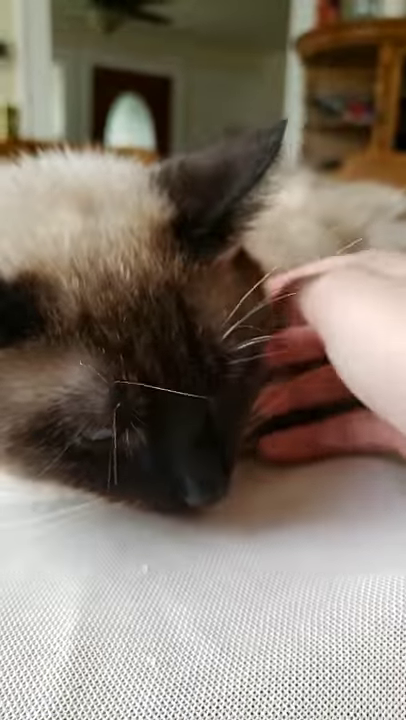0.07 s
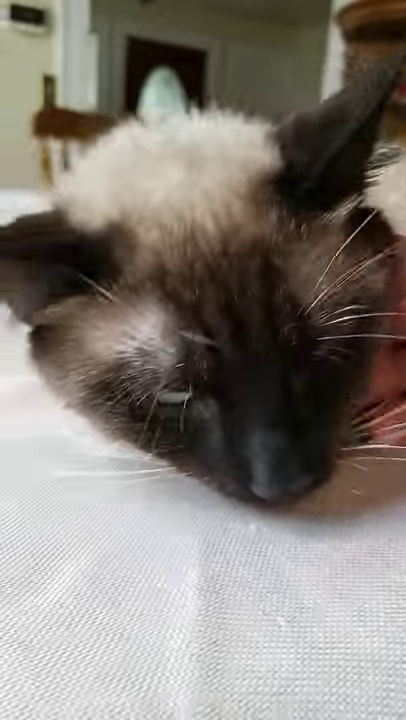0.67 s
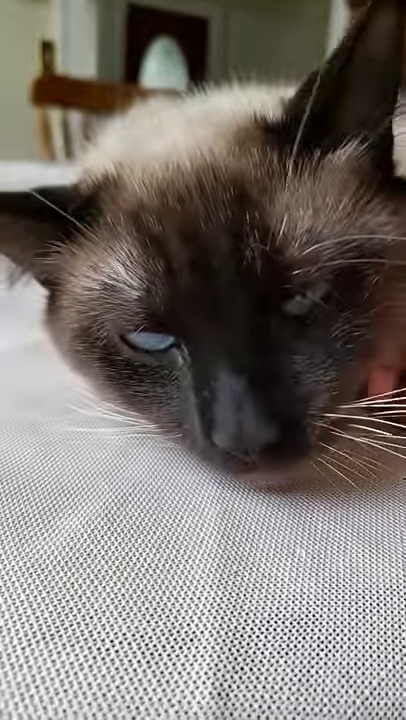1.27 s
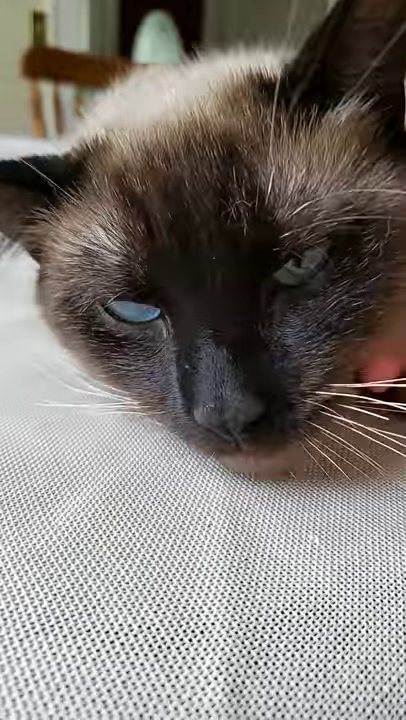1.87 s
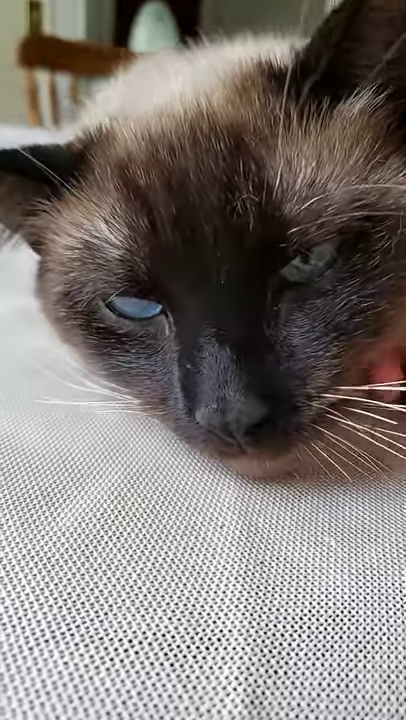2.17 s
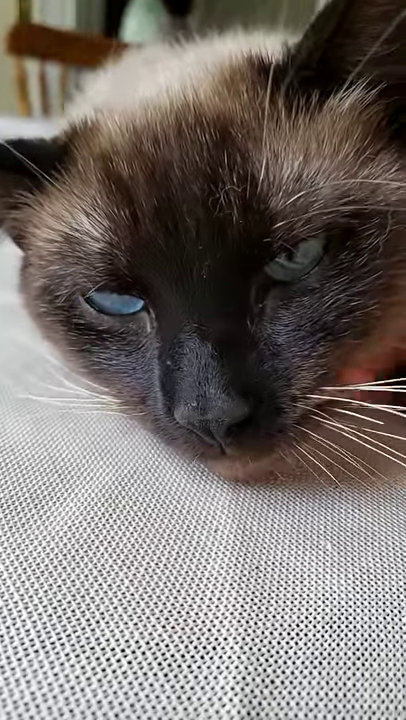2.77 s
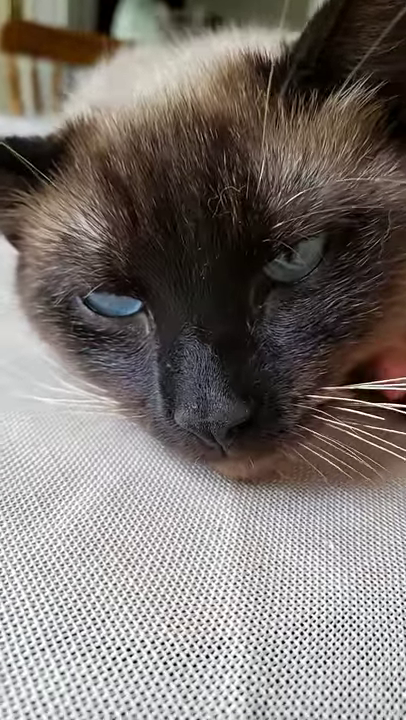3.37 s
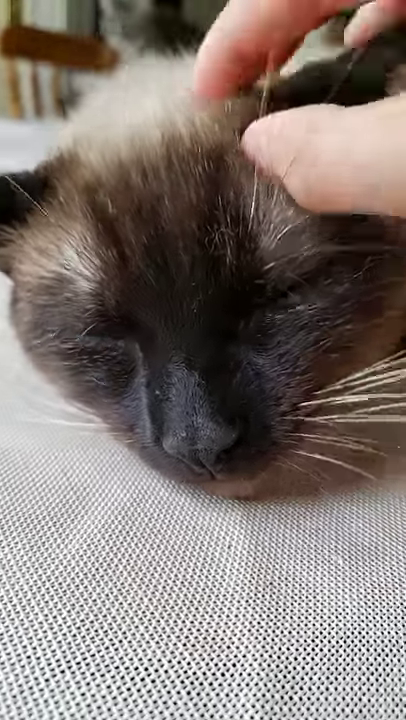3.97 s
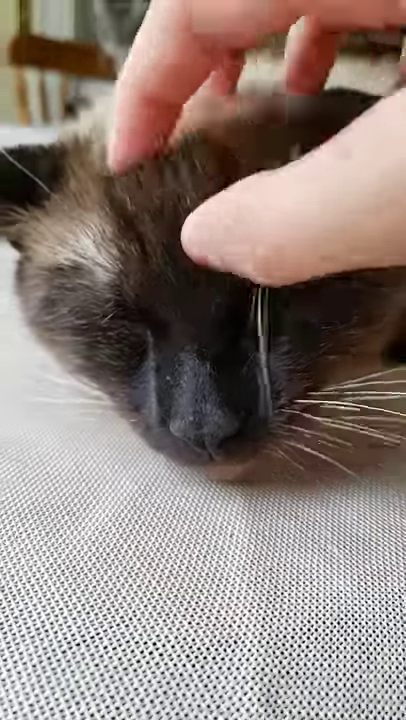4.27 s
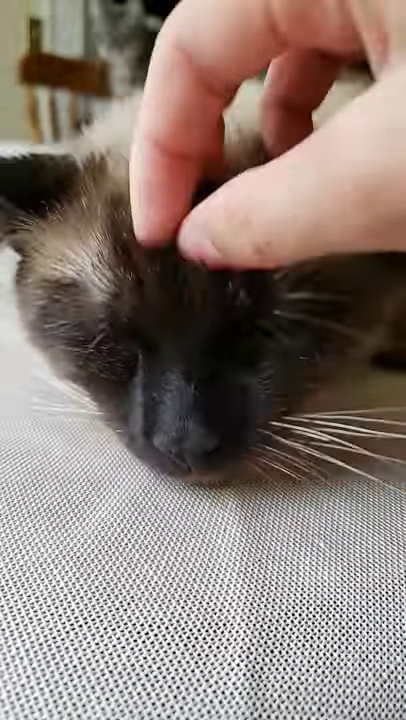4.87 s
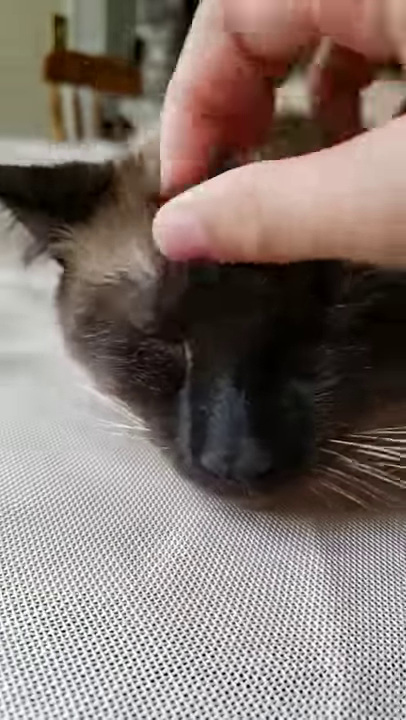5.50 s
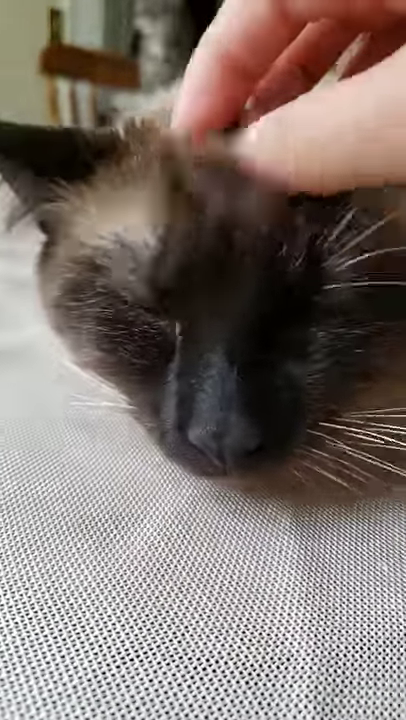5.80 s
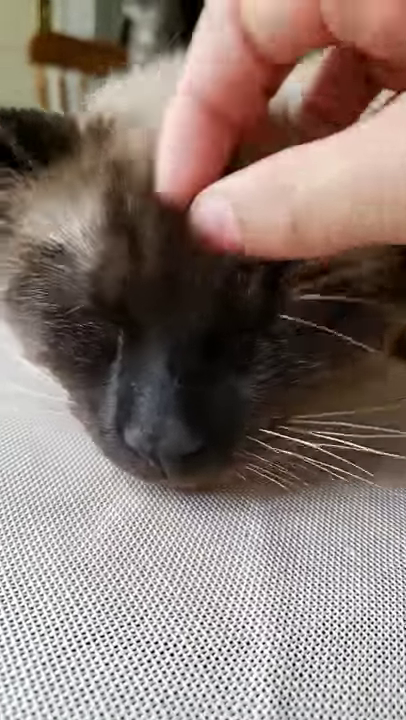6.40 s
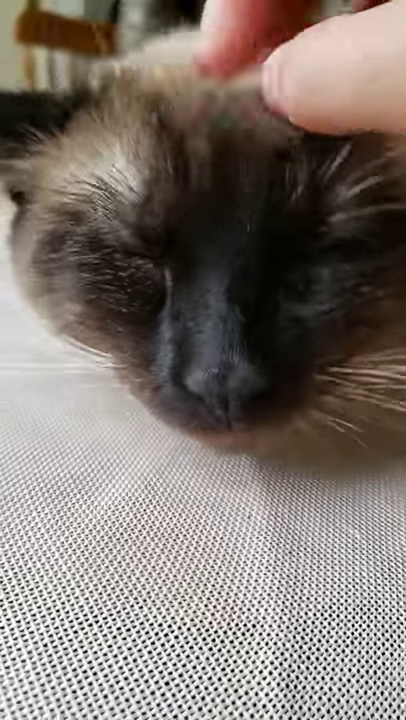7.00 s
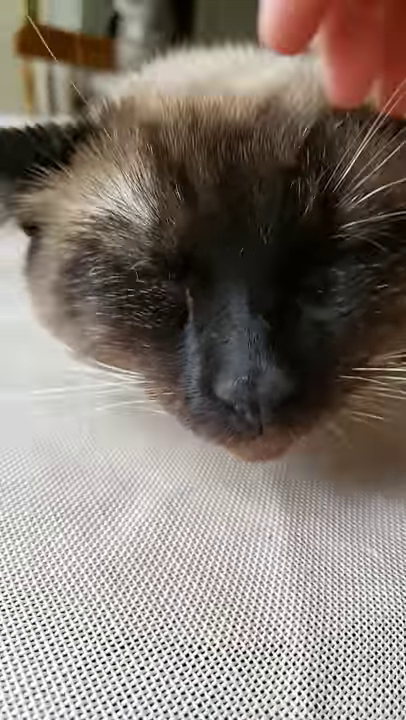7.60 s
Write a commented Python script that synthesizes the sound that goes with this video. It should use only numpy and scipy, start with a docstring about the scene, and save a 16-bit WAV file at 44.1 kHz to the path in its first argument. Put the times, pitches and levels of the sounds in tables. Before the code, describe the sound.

Fingers quietly stroke a cat's coat indoors, with a few dull microphone bumps and a low ventilation drone.

```python
"""Fingers rub a cat's cheek, then scratch the top of its head, close to a hand-held camera.
Each stroke bends and releases a crowd of hairs: a faint, bright swish with a coarser scratch in it,
and now and then the tick of one stiff hair. The arm rustles and the hand bumps the camera softly.
Low rumble swells: the room's deep boom at both microphones, handling rumble at the right one.
Underneath lies a bed of ventilation drone, motor hum and microphone hiss."""
import sys
import numpy as np
from scipy import signal
from scipy.fft import rfft, irfft
from scipy.io import wavfile

SR = 44100
rng = np.random.default_rng(int(sys.argv[2]) if len(sys.argv) > 2 else 0)


def int16_out(signal):
    """Quantize to a 16-bit WAV file."""
    q = np.round(np.clip(np.atleast_2d(signal).T, -1, 1) * 32767)
    wavfile.write(sys.argv[1], SR, q.astype(np.int16))


N = 337365
TIME, FREQS = np.arange(N) / SR, np.fft.rfftfreq(N, 1 / SR)

# firm finger strokes: fastest at t/s, length/s, swish level/dB, scratch send/dB
STROKES = [(.865, 0.3, -78, -6.5), (1.312, 0.071, -76.5, -9), (1.62, 0.11, -73.5, -9.5),
           (1.755, 0.13, -75, -8), (2.007, .055, -69.5, -6.5), (2.12, 0.11, -67.5, -7.5),
           (2.32, 0.025, -71.5, -4.5), (2.38, .07, -75, -3.5), (2.436, 0.095, -82, -4),
           (2.575, 0.049, -70, -8), (2.648, 0.086, -79, -6), (3.44, .143, -68, -15),
           (3.862, 0.068, -68.5, -13), (3.918, 0.087, -68, -11), (4.12, .14, -78.5, -5.5),
           (4.225, 0.1, -67.5, -11.5), (4.396, .11, -68, -9), (4.512, .085, -68, -10),
           (4.655, 0.088, -67.5, -11), (4.76, .065, -68.5, -9.5), (4.867, .12, -75, -8),
           (4.941, 0.063, -65, -8), (5.012, .2, -74, -5.5), (5.145, 0.1, -68, -9),
           (5.29, 0.095, -66, -10.5), (5.426, .108, -64.5, -11.5), (5.553, 0.22, -73, -8.5),
           (5.833, 0.079, -67.5, -7.5), (6.1, 0.16, -71, -11.5), (6.365, 0.089, -71, -6),
           (6.595, 0.066, -70.5, -9), (6.804, 0.18, -72, -9.5), (6.99, .08, -65.5, -12),
           (7.116, 0.29, -72, -7.5), (7.223, 0.043, -66, -14), (7.304, 0.072, -71, -8)]
# spells of light rubbing: start/s, end/s, swish level/dB
RUB_SPELLS = [(0, 0.19, -76), (.6, 2.94, -80.5), (3.95, 7.55, -81.5)]
# where the fingers are: t/s, place (0 cheek .. 1 top of the head)
FINGER_PLACE = [(0, 0.029), (2.6, 0.05), (3.45, .4), (3.9, .6), (4.25, 0.81), (7.65, 1)]
# EQ of the hair tips' swish: f/Hz, gain/dB
SWISH_EQ = [(1500, -59), (5000, -26.5), (9000, -24.5), (10800, -6.5), (12100, -1.5), (14200, 2.5),
            (15100, 6.5), (16000, -3)]
# EQ of the scratch through the coat: f/Hz, gain/dB
SCRATCH_EQ = [(500, -11), (1000, 3.5), (2200, -2.5), (3300, -2.5), (5300, -4), (6800, -1.5), (7900, 4.5),
              (8600, -1), (10500, -3.5), (15000, -22.5)]
# the fingers cup a hollow against the head: t/s, length/s, f/Hz, ring send/dB
CUPS = [(2.0, 0.087, 10300, 5), (2.13, 0.14, 11800, 1), (2.35, 0.14, 7700, 4), (2.62, 0.15, 7800, 1),
        (3.9, .2, 7600, 1), (4.99, .24, 7000, 2.5)]
# fur at the right microphone against the left: f/Hz, gain from the cheek/dB, gain from the top/dB
RIGHT_MIC_EQ = [(1000, -7, -6), (1390, 3, 2), (1930, 11, -2), (2770, -3, -1.5), (4270, 3.5, -2.5),
                (5800, 6, -1.5), (7300, 6.5, -3), (7520, -2.5, -7), (8700, -11, -19), (9400, -2, -7),
                (11700, -1, -12.5), (15300, -6, -29)]
# single hairs snap back: t/s, peak level/dB, left-right/dB, centre f/Hz
HAIR_SNAPS = [(.493, -61.5, -8, 1900), (.738, -62, 8, 1100), (2.089, -63, 2, 2000), (2.122, -51, 5, 12000),
              (2.325, -63, 7, 7500), (4.657, -55, 10, 13000), (4.751, -62, 11, 7490), (4.938, -58, 9, 8000),
              (5.41, -59, 11, 13000)]
# the arm moves: t/s, length/s, relative level/dB, left-right/dB
ARM_MOVES = [(.12, .25, -83.5, -8), (0.788, 0.29, -81, -2), (1.177, 0.41, -82, -1), (2.128, 0.13, -74, -3),
             (2.775, 0.34, -81.5, -3), (3.12, 0.29, -79, -4), (3.594, 0.17, -81.5, 0),
             (4.497, .08, -79, -1), (4.825, 0.18, -80.5, 9), (5.135, 0.68, -80.5, -2),
             (6.1, 0.22, -86, -3.5), (6.783, 0.15, -78.5, 5.5), (7.6, 0.26, -79, 1)]
# EQ of the arm's rustle: f/Hz, gain/dB
RUSTLE_EQ = [(300, -22.5), (700, -7), (880, 0.5), (1100, -0.5), (1280, -5), (1500, -10), (1850, -11.5),
             (2300, -22), (3500, -31)]
# the hand bumps the camera: t/s, peak level/dB, f/Hz, left-right/dB
BUMPS = [(0.823, -37, 51.3, -1), (2.07, -38.5, 62.4, -14), (6.214, -40, 65, -22), (6.294, -35, 55, -16),
         (6.484, -39.5, 50.3, -3), (6.774, -39.5, 218, -3)]
# low rumble swells: t/s, length/s, relative level/dB, left-right/dB
RUMBLE_SWELLS = [(0.143, 0.28, -46.5, -0.5), (0.788, 0.27, -43.5, -1), (1.743, 0.15, -48, -18.5),
                 (2.054, 0.31, -50, -14), (3.28, .25, -47, 0), (3.923, 0.097, -49.5, -18),
                 (4.202, 0.23, -48, 1), (5.45, 0.21, -46.5, 2), (6.225, 0.17, -44, -18)]
# EQ of the low rumble: f/Hz, gain/dB
LOW_RUMBLE_EQ = [(15, -32.5), (32, -6.5), (46, 0.5), (60, -1), (80, -0.5), (110, -12.5), (160, -21.5),
                 (300, -34.5), (600, -79)]
# EQ of the moving air's rumble: f/Hz, gain/dB
AIR_EQ = [(15, -35.5), (30, -17), (42, -5), (60, -7.5), (125, -7.5), (150, -15), (190, -18.5), (300, -17.5),
          (380, -19.5), (450, -22.5), (560, -30), (720, -38.5), (1000, -51), (3000, -67.5)]
# room resonances: f/Hz, width/Hz, relative level/dB
ROOM_MODES = [(49.25, 6, -52), (76.4, 24, -56), (102.3, 4.7, -53.5), (118.9, 8.7, -58), (219.8, 5.7, -68.5),
              (235.3, 18, -64.5), (277, 15, -63.5), (312.4, 13, -69.5), (430.3, 25, -74.5),
              (509.4, 9.1, -79), (538.5, 7.2, -80), (610, 23, -81)]
# the room's stereo image: f/Hz, left-right likeness (0..1), left-right/dB
ROOM_STEREO = [(39.7, 1, 0.5), (69.3, 0.95, -1), (115.5, 0.88, -1.5), (173, 0.87, 1.5), (273, 0.77, 0),
               (444, 0.54, -2.5), (595, 0.34, -2), (1150, 0, -1.5), (2410, 0, 0)]
# the low hum surges: t/s, level/dB
HUM_SURGES = [(1.85, -46), (2.8, -48), (3.2, -49), (3.54, -45.5), (3.83, -47.5), (4.11, -48), (4.56, -47),
              (5.84, -46), (6.18, -45.5), (6.46, -48.5)]
# fader ride of the hum's third harmonic: t/s, relative level/dB
THIRD_RIDE = [(0, -71), (1.2, -65.5), (2.0, -64), (3.1, -63), (3.7, -69), (4.5, -65), (6.3, -65),
              (7.65, -70)]
# the higher tone swells: t/s, length/s, relative level/dB
TONE_SWELLS = [(1.52, 0.15, -57.5), (1.75, 0.26, -54), (3.97, 0.14, -58.5), (4.28, .2, -62),
               (4.71, 0.15, -58.5), (4.97, 0.21, -57.5), (5.26, 0.15, -55.5), (5.47, 0.13, -55),
               (6.89, 0.27, -55), (7.2, .1, -58.5)]
# faint steady tones in the hum: f/Hz, level/dB, left-right/dB, left phase lead/rad
FAINT_TONES = [(265.3, -72, 2, 0.74), (301.4, -72.5, -11, 0)]
# EQ of the microphone hiss: f/Hz, gain/dB
HISS_EQ = [(500, 1.5), (2000, 3.5), (3000, 3), (5000, -0.5), (7500, -4.5), (9000, -9), (10500, -3),
           (12300, 3.5), (14300, 1), (15200, 5), (16000, 2.5)]


def fur(scratch_trim_db=1.5, rub_scratch_db=-11.5, catch_db=1.06):
    """Each stroke speeds up and slows down, catching unevenly in the coat."""
    light = rubbing()
    swish_gain = swells([(s, length, db) for s, length, db, _ in STROKES], light)
    scratches = [(s, length, db + send_db) for s, length, db, send_db in STROKES]
    scratch_gain = amp(scratch_trim_db) * swells(scratches, amp(rub_scratch_db) * light)
    swish = swish_gain * hairs(SWISH_EQ, per_s=11000, spread_db=-1.2)
    scratch = scratch_gain * hairs(SCRATCH_EQ, per_s=13000, spread_db=0.6)
    left, right = hand_hollow(swish + scratch) * amp(catch_db * drift(74))
    return np.array([left, camera_shadow(right)])


def rubbing(uneven_db=3.7, uneven_hz=7, fade_s=0.062):
    """The envelope of light, uneven rubbing while the fingers stay in the coat."""
    spells = sum(amp(db) * (np.tanh((TIME - start) / fade_s) - np.tanh((TIME - end) / fade_s)) / 2
                 for start, end, db in RUB_SPELLS)
    return spells * amp(uneven_db * drift(uneven_hz))


def hairs(eq, per_s, spread_db):
    """A dense crowd of tiny slips of uneven size; each microphone picks up its own."""
    slips = rng.standard_normal((2, N)) * (rng.random((2, N)) < per_s / SR)
    sizes = amp(spread_db * np.minimum(rng.exponential(1, N), 4))
    return unit_rms(equalise(slips * sizes, eq))


def hand_hollow(sound, open_hz=7000, open_db=-13, width_hz=900):
    """The hollow between fingers and head rings: faintly under the open hand, more when cupped."""
    cupped = sum(amp(db) * swell(s, length) * resonate(sound, hz, width_hz)
                 for s, length, hz, db in CUPS)
    return sound + cupped + amp(open_db) * resonate(sound, open_hz, width_hz)


def camera_shadow(right):
    """The camera body shades the right microphone more once the hand is on top of the head."""
    on_top = curve(FINGER_PLACE)
    from_cheek, from_top = (equalise(right, RIGHT_MIC_EQ, column) for column in (1, 2))
    return (1 - on_top) * from_cheek + on_top * from_top


def hair_snaps(decay_cycles=1.6, width_octaves=1.0):
    """A stiff hair slips off a finger with a tiny tick; duller ticks last longer."""
    out = np.zeros((2, N))
    t = np.arange(512) / SR
    hz = np.fft.rfftfreq(len(t), 1 / SR)
    for s, db, balance_db, centre_hz in HAIR_SNAPS:
        burst = rng.standard_normal((2, len(t))) * np.exp(-t * centre_hz / decay_cycles)
        centred = np.roll(burst, len(t) // 2, axis=1)  # leaves the filter space to ring both ways
        tick = irfft(rfft(centred) * band(hz, centre_hz, width_octaves))
        tick /= np.abs(tick).max(axis=1, keepdims=True)
        add(out, s - t[-1] / 2, amp(db) * pan(balance_db) * tick)
    return out


def arm_rustle(trim_db=4.0, rest_db=-82.5, uneven_db=1.5):
    """Dull, soft noise that follows the arm as it moves from side to side."""
    rest = amp(rest_db + uneven_db * drift(5.4)) * pan(-1.0)
    move_power = sum((amp(db) * pan(balance_db) * swell(s, length)) ** 2
                     for s, length, db, balance_db in ARM_MOVES)
    return amp(trim_db) * np.sqrt(rest ** 2 + move_power) * room_noise(amp(spectrum(RUSTLE_EQ)))


def camera_bumps(fade_cycles=0.71):
    """The hand pushes the camera: a cycle or two of dull thud."""
    out = np.zeros((2, N))
    for s, db, hz, balance_db in BUMPS:
        cycles = hz * (TIME - s)
        thud = np.exp(-(cycles / fade_cycles) ** 2) * np.cos(2 * np.pi * cycles)
        out += amp(db) * pan(balance_db) * thud
    return out


def low_rumble(trim_db=-1, stereo_width=0.19):
    """Low rumble swells: the room's deep boom at both microphones, handling rumble at the right one."""
    noise = rng.standard_normal(N) + stereo_width * rng.standard_normal((2, N))
    gain = sum(amp(db) * pan(balance_db) * swell(s, length)
               for s, length, db, balance_db in RUMBLE_SWELLS)
    return amp(trim_db) * gain * unit_rms(equalise(noise, LOW_RUMBLE_EQ))


def ventilation(rumble_db=-52.5, modes_db=-48.5):
    """Moving air rumbles, and the room rings with it at its resonances."""
    rumble = amp(rumble_db) * room_noise(amp(spectrum(AIR_EQ)))
    mode_power = sum(amp(db) ** 2 / width / (1 + ((FREQS - hz) / (width * 0.56)) ** 2) ** 2
                     for hz, width, db in ROOM_MODES)
    return rumble + amp(modes_db) * room_noise(np.sqrt(mode_power))


def motor_hum(hz=118.35, rest_db=-56.5, surge_s=0.14, wander_db=2.0, wander_hz=3.5, third_trim_db=-1.5):
    """A motor's low, surging hum and its third harmonic."""
    rest = amp(rest_db + wander_db * drift(wander_hz))
    gain = swells([(s, surge_s, db) for s, db in HUM_SURGES], rest)
    low = gain * tone(hz, 0, balance_db=2.0, lead_rad=0, waver_hz=1.091)
    third = tone(3 * hz, third_trim_db + curve(THIRD_RIDE), balance_db=8.0, lead_rad=0.7, waver_hz=0.72)
    return low + third


def upper_hum(hz=401.6, rest_db=-69, wander_db=3.5, wander_hz=3.5, air_db=-14):
    """A higher tone swells and fades with a soft rush of air, over faint steady tones."""
    gain = swells(TONE_SWELLS, amp(rest_db + wander_db * drift(wander_hz)))
    air = amp(air_db) * room_noise(band(FREQS, centre_hz=596, octaves=0.39))
    breathy = tone(hz, db=0.6, balance_db=-3, lead_rad=1.0, waver_hz=1.37) + air
    return gain * breathy + sum(tone(*row) for row in FAINT_TONES)


def mic_hiss(level_db=-76.5, balance_db=1.6):
    """Each microphone's own steady hiss."""
    return amp(level_db) * pan(balance_db) * unit_rms(equalise(rng.standard_normal((2, N)), HISS_EQ))


def room_noise(gain):
    """Diffuse noise: alike at both microphones in the bass, unrelated in the treble."""
    common, separate = rfft(rng.standard_normal((2, N)))
    likeness = spectrum(ROOM_STEREO)
    pair = np.array([common, likeness * common + np.sqrt(1 - likeness ** 2) * separate])
    return unit_rms(irfft(pair * gain * pan(spectrum(ROOM_STEREO, column=2)), N))


def tone(hz, db, balance_db, lead_rad, waver_hz=0.7):
    """A sine that wavers a little in pitch, with a phase lead on the left."""
    phase = 2 * np.pi * np.cumsum(hz + waver_hz * drift(4.07)) / SR
    return np.sqrt(2) * amp(db) * pan(balance_db) * np.sin([phase + lead_rad, phase])


def swell(s, length, rise_share=0.44, roundness=1.3):
    """An envelope that rises to one at time s and dies away; roundness 1 is pointed, 2 is round."""
    near = slice(max(int((s - 2 * length) * SR), 0), int((s + 2 * length) * SR))
    t, out = TIME[near] - s, np.zeros(N)
    slope_s = length * np.where(t < 0, rise_share, 1 - rise_share)
    out[near] = np.exp(-np.abs(t / slope_s) ** roundness)
    return out


def swells(rows, rest):
    """Swells (t/s, length/s, level/dB) add their power to a resting gain."""
    return np.sqrt(rest ** 2 + sum((amp(db) * swell(s, length)) ** 2 for s, length, db in rows))


def drift(hz):
    """Smooth random modulation of rms one, up to about the given rate."""
    rates, phases = hz * np.abs(rng.standard_normal((32, 1))) / 2, rng.random((32, 1))
    coarse = TIME[::32]
    wobble = np.sin(2 * np.pi * (rates * coarse + phases)).sum(0)
    return unit_rms(np.interp(TIME, coarse, wobble))


def resonate(x, hz, width_hz):
    """A resonance of gain one."""
    radius = np.exp(-np.pi * width_hz / SR)
    return 2 * signal.lfilter([1 - radius], [1, -radius * np.exp(2j * np.pi * hz / SR)], x).real


def band(hz, centre_hz, octaves):
    """A bell-shaped band-pass gain."""
    return np.exp(-(np.log2((hz + 1) / centre_hz) / octaves) ** 2)


def equalise(x, eq, column=1):
    """Runs a sound through an EQ table."""
    return irfft(rfft(x) * amp(spectrum(eq, column)), N)


def spectrum(table, column=1):
    """One column of a table by frequency, joined on a log axis."""
    columns = np.transpose(table)
    return np.interp(np.log(FREQS + 1), np.log(columns[0] + 1), columns[column])


def curve(table):
    """Automation: points in time joined by straight lines."""
    return np.interp(TIME, *np.transpose(table))


def add(mix, s, sound):
    """Lays a sound into the mix at time s."""
    part = mix[:, max(round(s * SR), 0):][:, :sound.shape[-1]]
    part += sound[..., :part.shape[1]]


def pan(db):
    """Left and right gains for a level difference."""
    return amp(np.array([[.5], [-.5]]) * db)


def amp(db):
    """Decibels to gain."""
    return 10 ** (np.asarray(db) / 20)


def unit_rms(x):
    """Scales to an rms of one."""
    return x / np.sqrt(np.mean(x ** 2) + 1e-30)


def scene():
    """The fur close by, over the drone of the room."""
    petting = fur() + hair_snaps()
    movement = arm_rustle() + camera_bumps()
    bed = low_rumble() + ventilation() + motor_hum() + upper_hum() + mic_hiss()
    return petting + movement + bed


def record(dry):
    """A steep high cut at 15.5 kHz."""
    high_cut = signal.firwin(1501, 15500, window=("kaiser", 9), fs=SR)
    return signal.oaconvolve(dry, high_cut[None], "same")


dry = scene()
out = record(dry)
int16_out(out)
```